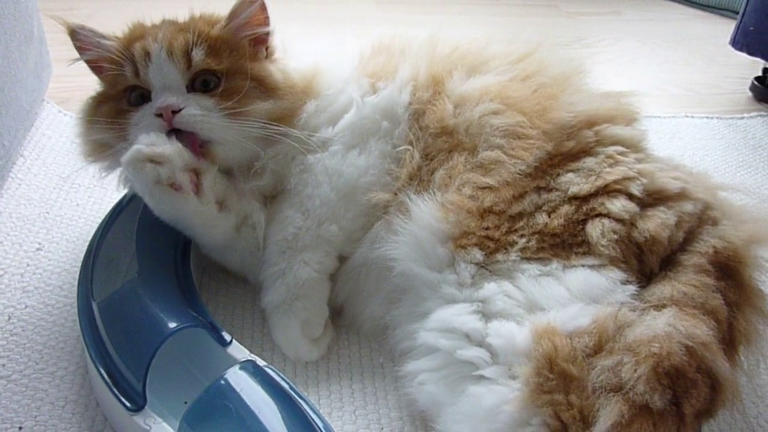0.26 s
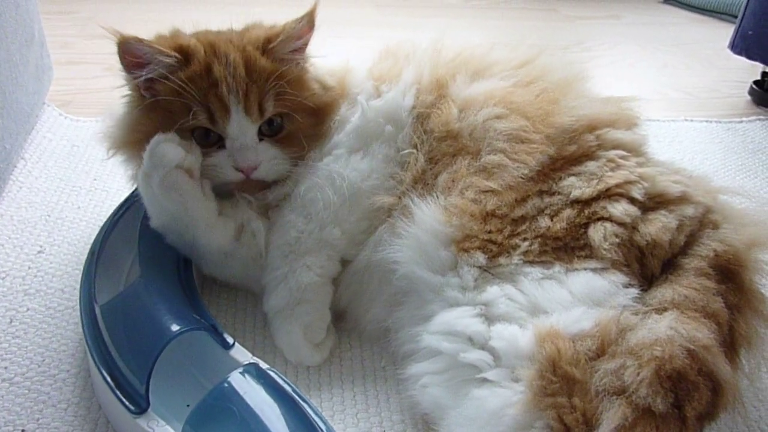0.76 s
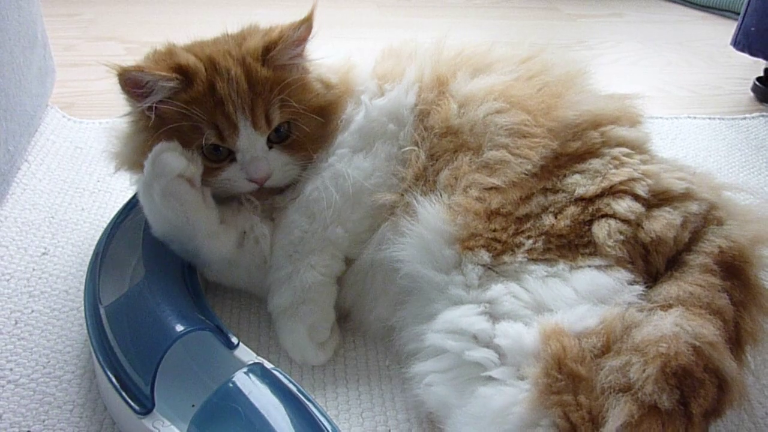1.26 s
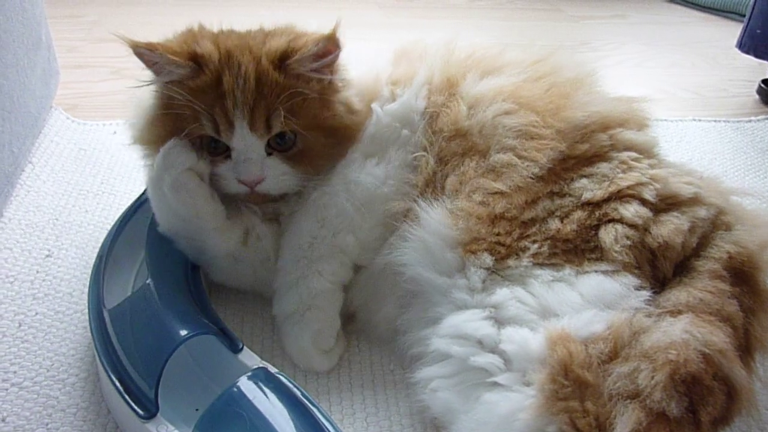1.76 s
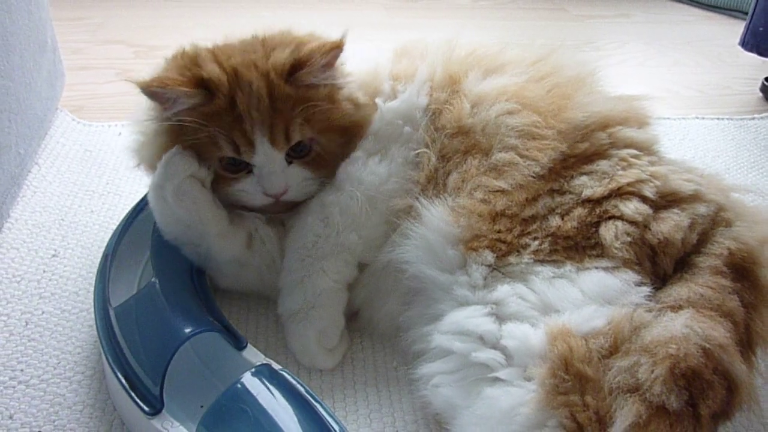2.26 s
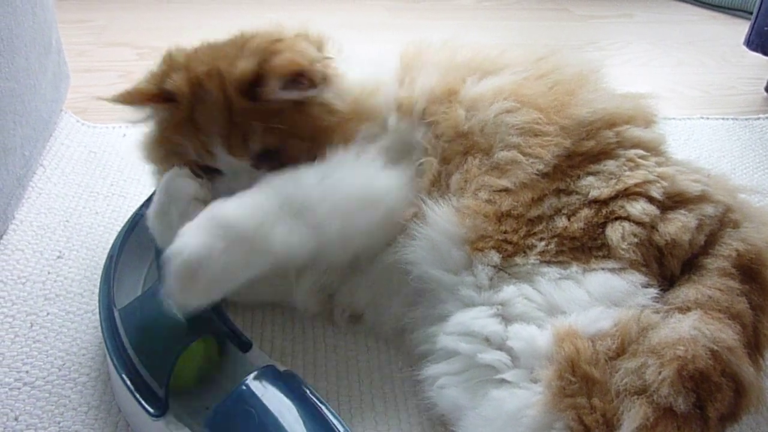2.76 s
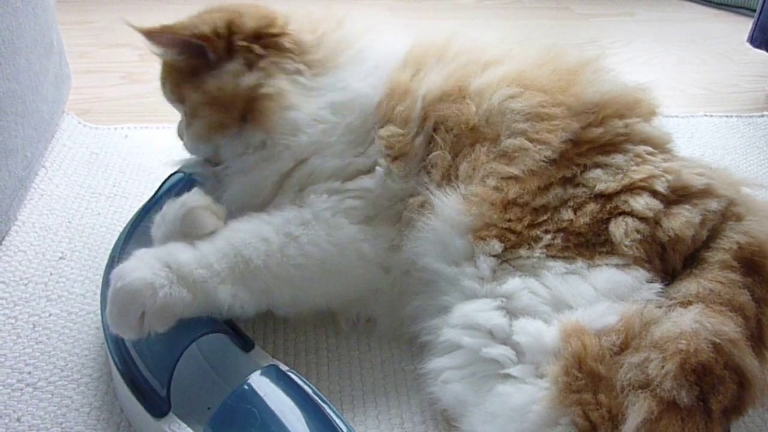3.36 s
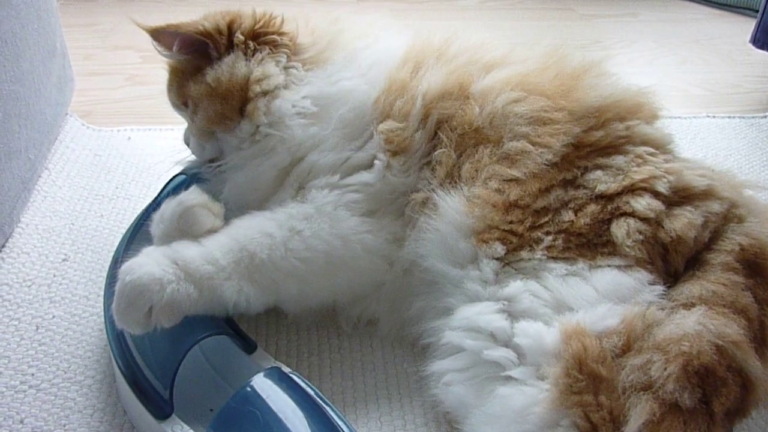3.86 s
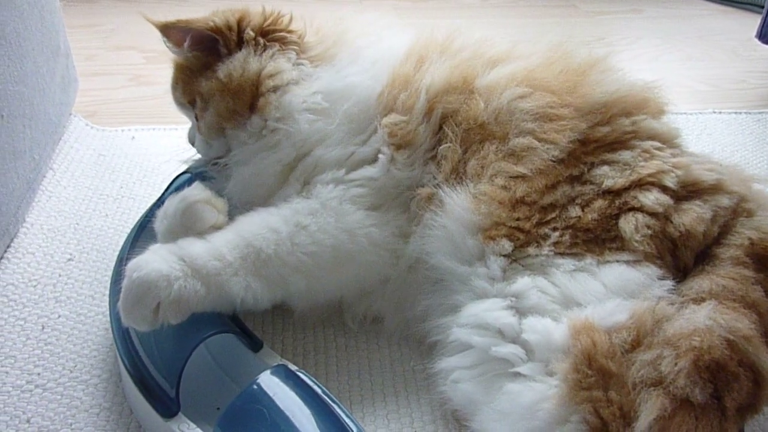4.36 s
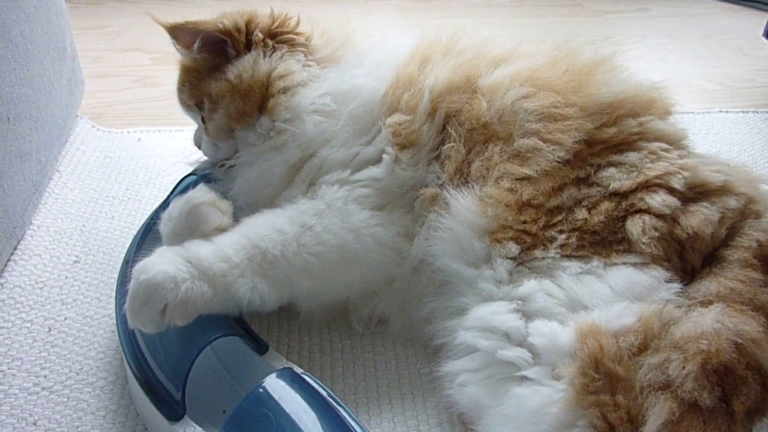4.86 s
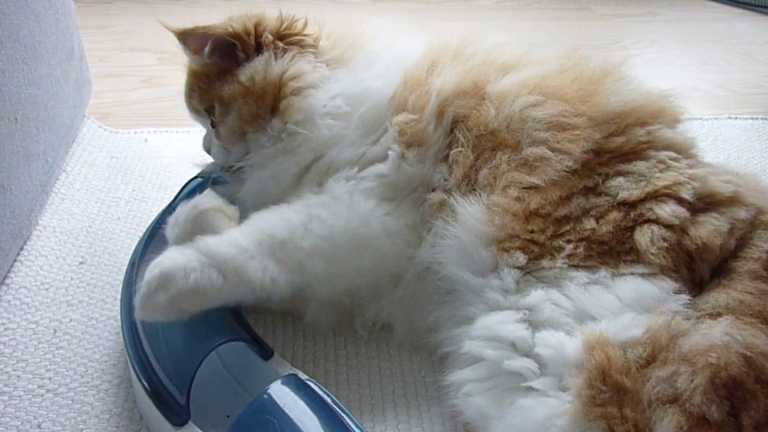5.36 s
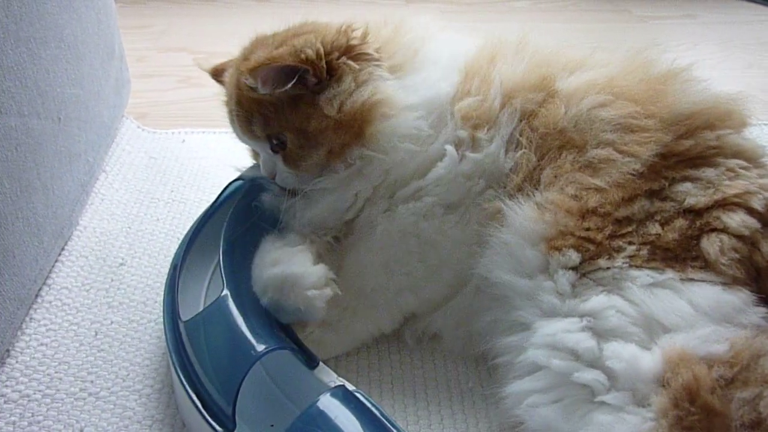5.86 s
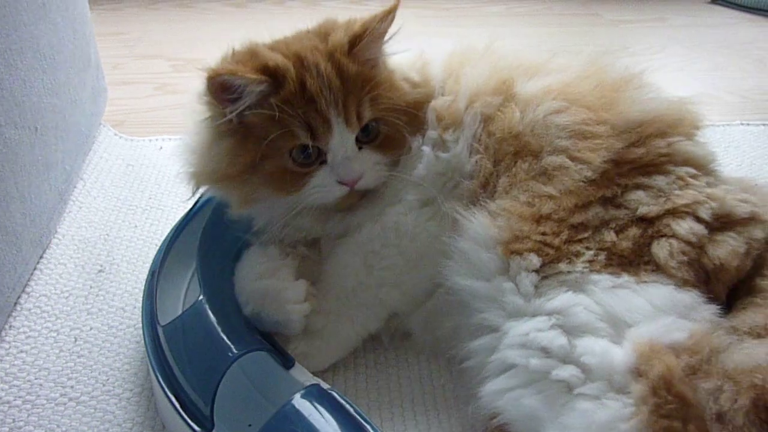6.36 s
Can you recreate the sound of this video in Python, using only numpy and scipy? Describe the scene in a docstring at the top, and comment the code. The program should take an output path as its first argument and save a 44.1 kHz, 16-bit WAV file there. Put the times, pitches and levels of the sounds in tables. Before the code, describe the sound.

Quiet room hiss and faint purring, a quick paw scrape on plastic, then a light ball clattering around a hollow track, twice.

```python
"""On a rug in a quiet room, close to a small hissy camera microphone: mains hum, room air and faint ticks.
A kitten purrs in faint bouts of dull larynx pulses, then its paw rubs the plastic of a ring track.
A hollow ball rolls off: many tiny bumps ring shell and tube, and knocks on walls and seams click and echo.
The ball fades out; purring and small ticks of mouth and claws lead to a second swipe.
The ball rolls again to the end, its pitches following its place in the ring."""
import sys
import numpy as np
from scipy import signal
from scipy.fft import rfft, irfft, next_fast_len
from scipy.io import wavfile
from scipy.ndimage import map_coordinates

SR = 44100
rng = np.random.default_rng(int(sys.argv[2]) if len(sys.argv) > 2 else 0)


def master(y):
    """Save y as 16-bit WAV."""
    cut = np.clip(np.atleast_2d(y).T, -1, 1)
    pcm = np.round(cut * 32767)  # scale
    wavfile.write(sys.argv[1], SR, pcm.astype(np.int16))


N = 291942  # length [samples]

# The ball's path, one table per run:
# (time [s], rolling level [dB], shell pitch [Hz], tube pitch [Hz])
ROLLS = [
    [(1.235, -55, 1200, 420), (1.28, -40.5, 1210, 424), (1.47, -39.5, 1206, 350), (1.57, -40, 940, 406),
     (1.7, -40.5, 840, 463), (1.85, -39, 877, 487), (2.05, -42, 728, 442), (2.25, -43.5, 890, 478),
     (2.41, -44, 1075, 477), (2.65, -44, 812, 380), (3.08, -44, 730, 510), (3.34, -49, 870, 404),
     (3.44, -69, 870, 336)],
    [(5.95, -44, 1100, 400), (6.08, -42, 920, 487), (6.27, -40.5, 990, 440), (6.34, -42, 1200, 480),
     (6.42, -46, 1020, 480), (6.62, -40.5, 1180, 420)],
]
# Stretches where the tube booms more or less: (time [s], half length [s], change [dB])
TUBE_BOOMS = [(1.5, 0.072, 2), (2.45, .33, 7.5), (6.52, 0.062, -9)]
# Colour of the plastic under rolling and knocks: (frequency [Hz], gain [dB])
SHELL_COLOUR = [(100, -27.5), (330, 1), (410, -12.5), (520, 1), (700, 1.5), (950, -4.5), (1250, -1),
                (1650, 3.5), (1950, 4), (2300, 2.5), (2800, -6), (3600, -11.5), (8000, -22.5)]
# Colour of the ring's hollow tube: (frequency [Hz], gain [dB])
TUBE_COLOUR = [(60, -13.5), (140, 0.5), (230, 5), (330, 3), (600, 9), (1100, 2.5), (1600, 9), (1950, 2),
               (2300, -10), (2800, 24.5), (4000, 5), (8000, -13)]
UPPER_HZ = 2285  # the ball's higher resonance
UPPER_DB, UPPER_FADE_DB_PER_S = -9.5, 11  # its share at the start of a run, and how fast that fades
TUBE_DB = -5  # rumble of the air in the tube, relative to the shell, before the booms


def rolling(run, pitch_spread, chatter_db):
    """Tiny bumps under the ball ring the shell and the air in the tube, both at gliding pitches."""
    s, _, shell_hz, tube_hz = np.transpose(run)
    bumps_per_s, size_db = 1200, 3
    count = int((s[-1] - s[0]) * bumps_per_s)
    shift, size, detune, side = rng.standard_normal((count, 4)).T
    times = np.linspace(s[0], s[-1], count) + .5 * shift / bumps_per_s
    # the ball hops slightly, so its load on the track comes and goes
    load_db = chatter_db * np.tanh(np.interp(times * SR, np.arange(N), wobble(130)))
    bump_db = load_db + size_db * np.clip(size, -2, 2)
    force = (np.sign(side) * amp(bump_db))[:, None]
    spread = np.exp(pitch_spread * detune)

    main = rings(np.interp(times, s, shell_hz) * spread, life=0.0014, attack=0.00024)
    # the higher resonance speaks most just after the swipe
    upper_gain = amp(UPPER_DB - UPPER_FADE_DB_PER_S * (times - s[0]))[:, None]
    upper = upper_gain * rings(UPPER_HZ * spread, life=0.0016, attack=0.00023)
    shell = coloured(placed(times, force * (main + upper)), SHELL_COLOUR)

    air = rings(np.interp(times, s, tube_hz) * spread, life=0.0027, attack=.00005)
    tube = coloured(placed(times, force * air), TUBE_COLOUR)

    moving = slice(int(s[0] * SR), int(s[-1] * SR))
    shell = shell / np.std(shell[moving])
    tube = tube / np.std(tube[moving])
    return level(run) * (shell + amp(TUBE_DB + swells(TUBE_BOOMS)) * tube)


# Lesser knocks: rate, then mean level and half range over the rolling level, and click level
RATTLES_PER_S, RATTLE_DB, RATTLE_SPREAD_DB, RATTLE_EDGE_DB = 55, 18.5, 3, -27.5


def rattles(run):
    """Lesser knocks at uneven intervals, following the rolling level: rows like KNOCKS."""
    s, roll_db = np.transpose(run)[:2]
    count = int((s[-1] - s[0]) * RATTLES_PER_S)
    shift, size, edge = rng.uniform(-1, 1, (count, 3)).T
    times = s[0] + (np.arange(count) + .5 + .5 * shift) / RATTLES_PER_S
    knock_db = np.interp(times, s, roll_db) + RATTLE_DB + RATTLE_SPREAD_DB * size
    return np.c_[times, knock_db, RATTLE_EDGE_DB + 5 * edge]


# The ball's clearest knocks on walls and seams, levels before trims and colour:
# (time [s], strength [dB], sharp edge relative to the strength [dB])
KNOCKS = [(1.3743, -18, -42), (1.4033, -10, -31.5), (1.4293, -17, -27), (1.4844, -10, -28),
          (1.4996, -12.5, -22), (1.6266, -17.5, -36), (1.6368, -10.5, -21.5), (1.6465, -19, -28),
          (1.6729, -14, -30), (1.691, -16, -22), (1.7098, -9, -24), (1.7324, -18.5, -42),
          (1.7499, -16.5, -32), (1.7781, -14.5, -41), (1.8268, -17, -40), (1.8413, -13.5, -42),
          (1.8542, -15, -44), (1.9004, -13.5, -34), (1.9075, -12, -29), (1.9258, -6.5, -25.5),
          (1.9504, -15.5, -28), (2.0483, -17, -24.5), (2.061, -13, -32), (2.0737, -14.5, -31),
          (2.1354, -17.5, -12), (2.1599, -15, -22), (2.1872, -17.5, -22), (2.2606, -13, -19.5),
          (2.2787, -15.5, -39), (2.3687, -15.5, -47), (2.3952, -8, -23.5), (2.4225, -18, -28),
          (2.4274, -16.5, -24), (2.4842, -20.5, -31), (2.5068, -21, -21), (2.524, -17, -24),
          (2.6127, -18, -28), (2.6718, -25.5, -15.5), (2.7015, -18, -22), (2.712, -20, -10.5),
          (2.7783, -20, -27), (2.8078, -19.5, -16.5), (2.8302, -20.5, -27), (2.8556, -21, -26),
          (2.8943, -19.5, -19), (2.9306, -24.5, -36), (2.9485, -18.5, -35), (3.0422, -19, -24),
          (3.0703, -16.5, -27), (3.1509, -25, -22), (3.2932, -31, -11), (3.3403, -23, -19),
          (5.9778, -21, -13), (5.9941, -13.5, -31), (6.0123, -6.5, -25), (6.0175, -10.5, -33),
          (6.0612, -7.5, -27), (6.0967, -16.5, -25), (6.1094, -19.5, -29), (6.1863, -19, -27),
          (6.2344, -18, -33), (6.245, -16, -19.5), (6.2902, -16, -20.5), (6.297, -17.5, -33),
          (6.3405, -14, -5.5), (6.3516, -6, -16.5), (6.3775, -18, -30), (6.3823, -7, -14),
          (6.3943, -17.5, -13), (6.5706, -13.5, -24)]
# Colour of a hard contact's click: (frequency [Hz], gain [dB])
EDGE_COLOUR = [(1000, -19.5), (2200, 18), (3600, 7.5), (5200, 7), (7000, 0), (8800, -9)]
# A knock's pitch where rolling rings at MID_HZ, and how closely it follows the rolling pitch
MID_HZ, KNOCK_HZ, KNOCK_FOLLOW = 1000, 1054, 0.58
# The higher resonance's share of a knock at the start of a run, and how fast it fades
KNOCK_UPPER_DB, KNOCK_UPPER_FADE_DB_PER_S = -16.5, 12


def knocks():
    """The ball hits a wall or seam: a short ring, a click, and echoes along the tube."""
    s, db, edge_db = np.vstack([KNOCKS] + [rattles(run) for run in ROLLS]).T
    place_s, _, place_hz, _ = np.vstack(ROLLS).T
    pitch_ratio = np.interp(s, place_s, place_hz) / MID_HZ
    detune = np.exp(0.059 * rng.standard_normal(len(s)))
    hz = KNOCK_HZ * pitch_ratio ** KNOCK_FOLLOW * detune

    starts = np.array([run[0][0] for run in ROLLS])
    age = s - starts[np.maximum(np.searchsorted(starts, s) - 1, 0)]  # [s] since the run began
    upper_gain = amp(KNOCK_UPPER_DB - KNOCK_UPPER_FADE_DB_PER_S * age)[:, None]
    upper = upper_gain * rings(np.full(len(s), UPPER_HZ), life=0.0012, attack=.0009)
    ring = amp(db - 2.0)[:, None] * (rings(hz, life=0.00091, attack=0.0014) + upper)

    # the echoes differ from knock to knock but carry a like share of the blow
    echoes = signal.fftconvolve(ring, bursts(len(s), life=0.0044), axes=1)
    share = np.linalg.norm(ring, axis=1) / np.linalg.norm(echoes, axis=1)
    echoes = echoes * share[:, None]
    body = placed(s, ring) + amp(-5.5) * placed(s + 0.001565, echoes)
    click = placed(s + 0.00019, amp(db + edge_db - 4)[:, None] * bursts(len(s), life=0.0024))
    return coloured(body, SHELL_COLOUR) + coloured(click, EDGE_COLOUR)


# Swipes of the paw: (time of full pressure [s], hold [s], friction level [dB])
SWIPES = [(1.262, 0.016, -32.5), (5.925, .07, -32)]
# Colour of the paw's rubbing: (frequency [Hz], gain [dB])
SCRAPE_COLOUR = [(100, -8), (210, 0), (320, 11.5), (450, 3.5), (650, 7.5), (1250, 15), (1700, 11.5),
                 (2000, 10.5), (2400, 6), (3600, 1.5), (5500, 0.5), (7500, -6), (8800, -10)]
SWIPE_RISE_DB_PER_S, SWIPE_FALL_DB_PER_S = 779, 298.5


def paw():
    """Fur and pads rub over the plastic in fine slips, as noise with a jittering level."""
    slips = amp(3.2 * wobble(600) + 1.1 * wobble(70))
    rubbing = unit(slips * noise(SCRAPE_COLOUR))
    return strokes(SWIPES, SWIPE_RISE_DB_PER_S, SWIPE_FALL_DB_PER_S) * rubbing


# Small ticks of mouth and claws:
# (time [s], strength [dB], dull body relative to the strength [dB], pitch [Hz])
TICKS = [(0.058, -42, 0, 990), (0.868, -47, 13.5, 1490), (3.831, -40, -16, 1630), (5.144, -43.5, -2, 1210),
         (5.827, -40.5, 5.5, 910), (5.868, -43, 10, 1630)]


def ticks():
    """Faint ticks: a small ring, a crisp noise edge and a dull noise body."""
    s, db, body_db, hz = np.transpose(TICKS)
    ring = placed(s, amp(db)[:, None] * rings(hz, life=.001, attack=.0003))
    edge = placed(s, amp(db - 6.0)[:, None] * bursts(len(s), life=0.0028))
    body = placed(s, amp(db + body_db)[:, None] * bursts(len(s), life=0.005))
    # colours: (frequency [Hz], gain [dB])
    crisp = coloured(edge, [(400, -30), (1600, 1.5), (3500, 10.0), (8000, -5.5)])
    dull = coloured(body, [(80, -13), (220, 9), (900, 0.0), (2500, -24)])
    return ring + crisp + dull


# Bouts of purring: (time [s], length [s], level [dB])
PURRS = [(.48, 0.44, -53.5), (1.52, 0.43, -56), (4.52, .45, -62.5), (5.7, 0.69, -58)]
# Colour of the throat's flap: (frequency [Hz], gain [dB])
THROAT_COLOUR = [(100, -8.5), (300, 7.5), (600, -8.5), (1200, -13), (3000, -32.5)]
PURR_RISE_DB_PER_S, PURR_FALL_DB_PER_S = 200, 68


def purr(pulses_per_s, chest_hz):
    """Slow pulses of the larynx: each is a dull noise flap with a ring of the kitten's chest."""
    times = np.arange(PURRS[0][0], N / SR, 1 / pulses_per_s)
    t = np.arange(SR // 20) / SR
    hz = chest_hz * np.exp(.035 * rng.standard_normal((len(times), 1)))
    chest = placed(times, np.sin(2 * np.pi * hz * t) * np.exp(-t / .02))
    flap = coloured(placed(times, bursts(len(times), life=0.0046)), THROAT_COLOUR)
    voice = chest + amp(11.0) * flap
    voice = voice / np.std(voice[int(times[0] * SR):int(times[-1] * SR)])
    return strokes(PURRS, PURR_RISE_DB_PER_S, PURR_FALL_DB_PER_S) * voice


# The room's decay: (frequency [Hz], time to fall 60 dB [s])
ROOM_DECAY = [(150, 0.74), (1000, 0.44), (8000, 0.31)]


def room(x):
    """The room's diffuse answer: decaying noise, shorter in the treble, 5 ms late."""
    hz, t, z = signal.stft(rng.standard_normal(SR // 2), SR, nperseg=256)
    decay = amp(-60 * t / along(ROOM_DECAY, hz)[:, None])
    tail = signal.istft(z * decay, SR, nperseg=256)[1]
    tail = np.pad(tail / np.linalg.norm(tail), (SR // 200, 0))
    return signal.fftconvolve(x, tail)[:N]


# Colour of the room's air: (frequency [Hz], gain [dB])
AIR_COLOUR = [(25, -27.5), (70, -4.5), (130, 6.5), (170, 7), (300, 3), (500, 0), (1000, -3), (2000, -9),
              (3500, -19.5), (8000, -21.5)]
# Colour of the hiss: (frequency [Hz], gain [dB])
HISS_COLOUR = [(800, -29.5), (1600, -4.5), (2400, 0), (3600, 0.5), (5800, -1.5), (7000, -3), (8000, -6),
               (8500, -12.5)]
# The hiss swells as fur shifts: (time [s], half length [s], change [dB])
RUSTLES = [(.35, 0.22, 2), (1.55, 0.29, 3.5), (2.8, 0.35, 1.5), (5.55, 0.25, 4), (6.4, 0.34, 2.5)]
HISS_DB = -60.5  # before the swells and the microphone


def background():
    """Low room noise and a soft hiss that swells a little, both coloured noise."""
    air = amp(-54.5 + 0.2 * wobble(17.0)) * noise(AIR_COLOUR)
    hiss = amp(HISS_DB + swells(RUSTLES)) * noise(HISS_COLOUR)
    return air + hiss


# Mains hum and the camera's faint whine, before the microphone: (frequency [Hz], rms level [dB])
HUM = [(100.1, -60), (7917, -66.5), (8083, -66.5)]


def hum():
    """Electrical tones of fixed pitch, slightly unsteady in level."""
    t = np.arange(N) / SR
    tones = 0
    for hz, db in HUM:
        gain = np.sqrt(2) * amp(db + .7 * wobble(5.5))
        tones = tones + gain * np.sin(2 * np.pi * hz * t)
    return tones


def amp(db):
    """Decibels to gain."""
    return 10 ** (np.asarray(db) / 20)


def unit(x):
    """Scale to rms 1."""
    return x / np.sqrt(np.mean(x ** 2) + 1e-20)


def along(points, hz):
    """(frequency [Hz], value) points read on a log frequency axis."""
    f, v = np.transpose(points)
    return np.interp(np.log(hz + 1), np.log(f), v)


def level(rows):
    """Gain per sample from (time [s], level [dB], ..) rows, all but silent outside them."""
    s, db = np.transpose(rows)[:2]
    return amp(np.interp(np.arange(N) / SR, s, db, left=-150, right=-150))


def swells(rows):
    """dB per sample from bell-shaped (time [s], half length [s], change [dB]) swells."""
    t = np.arange(N) / SR
    return sum(db * np.exp(-((t - s) / width) ** 2) for s, width, db in rows)


def strokes(rows, rise, fall):
    """Gain per sample from (time [s], hold [s], level [dB]) rows that rise and fall in dB a second."""
    t = np.arange(N) / SR
    gain = 0
    for s, hold, db in rows:
        before, after = np.maximum(s - t, 0), np.maximum(t - s - hold, 0)
        gain = gain + amp(db - rise * before - fall * after)
    return gain


def wobble(rate):
    """A smooth random curve, rate knots a second."""
    knots = rng.standard_normal(int(N * rate / SR) + 4)
    return map_coordinates(knots, [np.arange(N) * rate / SR])


def coloured(x, points):
    """Causal (minimum-phase) filter with the gain of (frequency [Hz], gain [dB]) points."""
    size = 2048
    cepstrum = irfft(np.log(amp(along(points, np.fft.rfftfreq(size, 1 / SR)))))
    # folding the cepstrum onto positive time makes the filter minimum-phase
    cepstrum[1:size // 2] *= 2
    cepstrum[size // 2 + 1:] = 0
    return signal.fftconvolve(x, irfft(np.exp(rfft(cepstrum))))[:N]


def noise(points):
    """Coloured noise of rms 1."""
    return unit(coloured(rng.standard_normal(N), points))


def placed(times, sounds):
    """Sum rows of sound, each starting at its time."""
    starts = np.round(np.abs(times) * SR).astype(int)
    index = starts[:, None] + np.arange(sounds.shape[1])
    return np.bincount(index.ravel(), sounds.ravel(), N)[:N]


def rings(hz, life, attack):
    """One row per contact: a tone builds up, swings a few times and dies; envelope peak 1."""
    t = np.arange(SR // 60) / SR
    swing = -np.sin(2 * np.pi * hz[:, None] * t)
    envelope = np.exp(-t / life) * (1 - np.exp(-t / attack)) ** 0.58
    return swing * envelope / envelope.max()


def bursts(count, life):
    """One row per contact: noise that dies away."""
    t = np.arange(SR // 20) / SR
    return rng.standard_normal((count, len(t))) * np.exp(-t / life)


def scene():
    """Toy and kitten close by, the toy's answer from the room, then air, hiss and hum."""
    ball = knocks() + sum(rolling(run, pitch_spread=0.083, chatter_db=6.5) for run in ROLLS)
    toy = ball + paw() + ticks()
    kitten = purr(pulses_per_s=27, chest_hz=164.0)
    return (toy + amp(-13.0) * room(toy) + kitten + background() + hum())[None]


# The microphone's treble roll-off: (frequency [Hz], gain [dB])
MICROPHONE = [(7000, 0.5), (7700, -2), (8400, -8.5), (8900, -25)]
# The camera's notch filters: (centre [Hz], width [Hz])
NOTCHES = [(3000, 1080), (4400, 1050), (8000, 670)]
TOP_HZ = 9000  # nothing passes from here up


def record(dry):
    """The camera cuts three notches, rolls off the treble and adds a constant offset."""
    size = next_fast_len(N + SR // 2)
    hz = np.fft.rfftfreq(size, 1 / SR)
    response = amp(along(MICROPHONE, hz)) * (hz < TOP_HZ)
    for centre, width in NOTCHES:
        detuning = centre ** 2 - hz ** 2
        response = response * detuning / (detuning + 1j * hz * width)
    offset = -.034  # of full scale
    return irfft(rfft(dry, size) * response, size)[..., :N] + offset


dry = scene()
out = record(dry)
master(out)
```